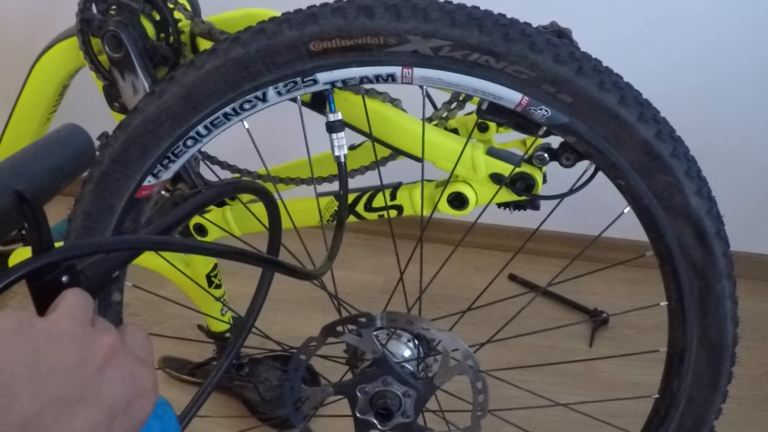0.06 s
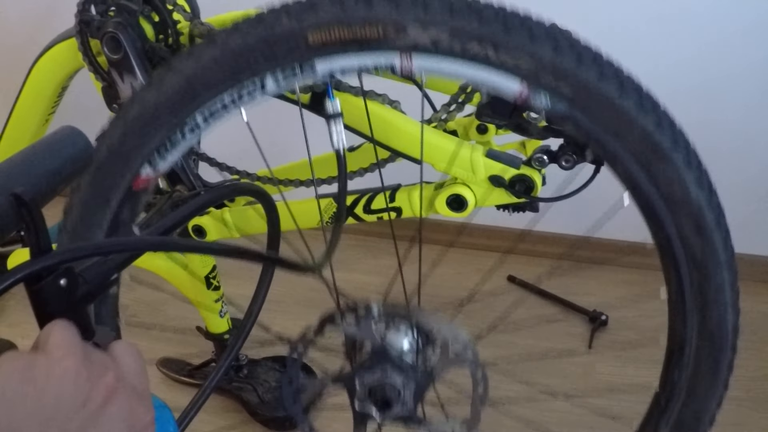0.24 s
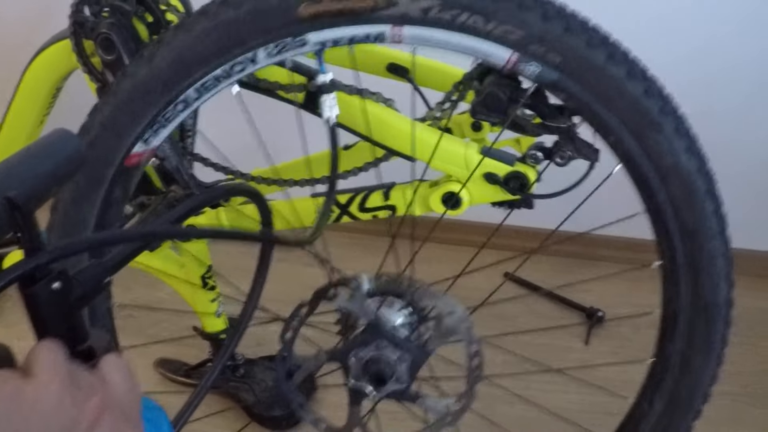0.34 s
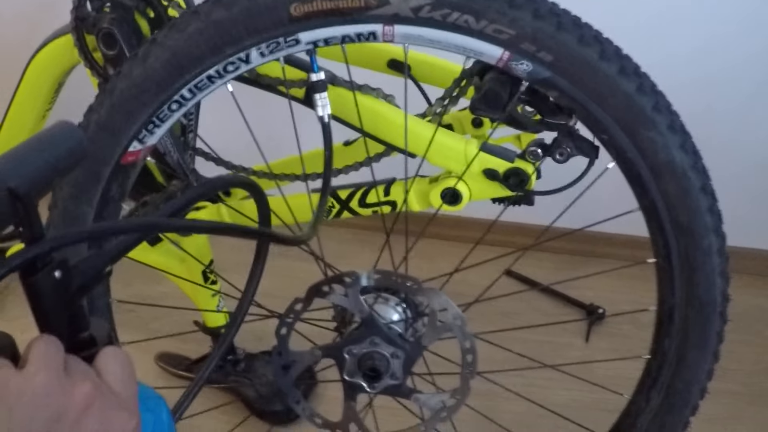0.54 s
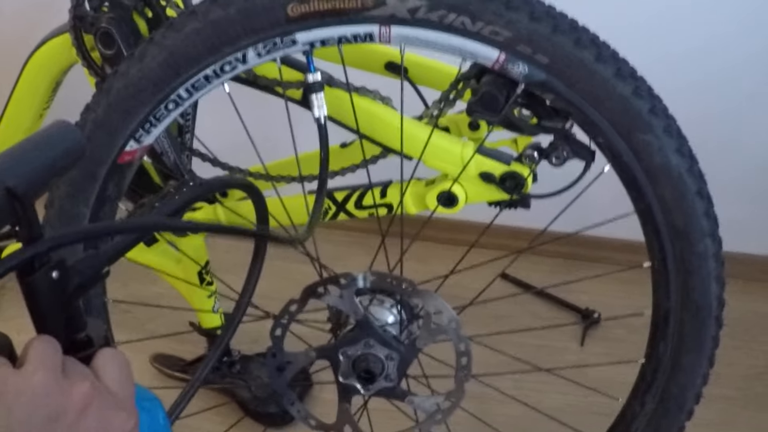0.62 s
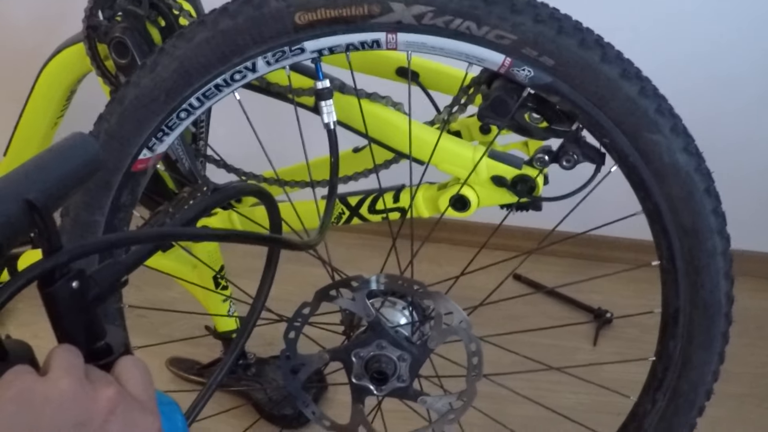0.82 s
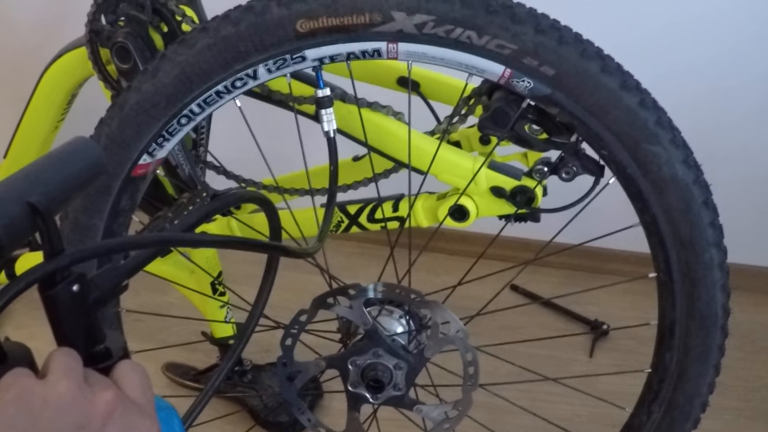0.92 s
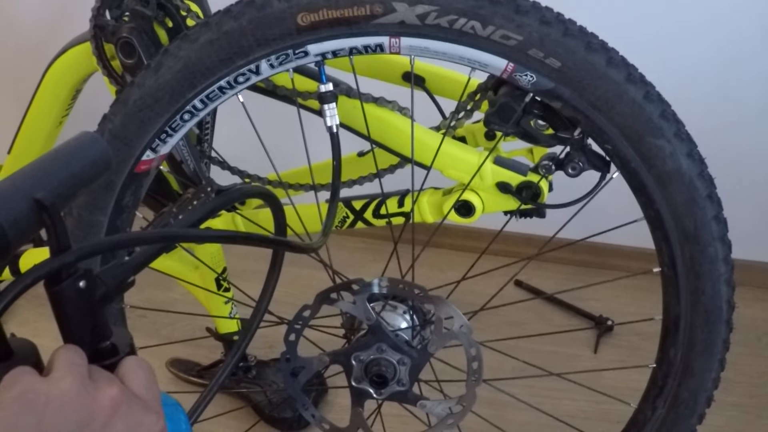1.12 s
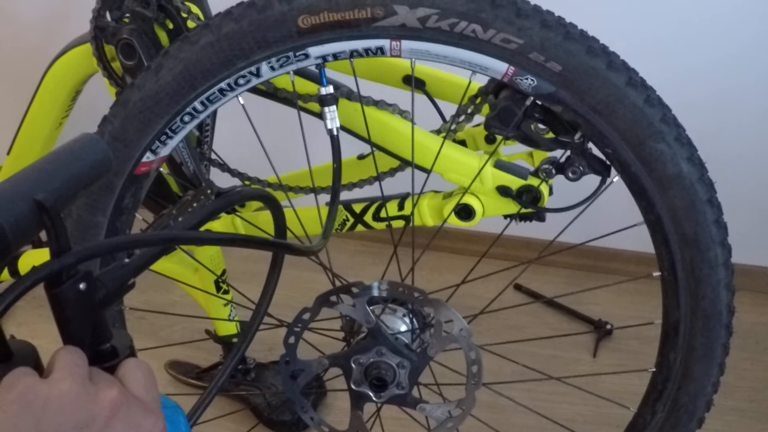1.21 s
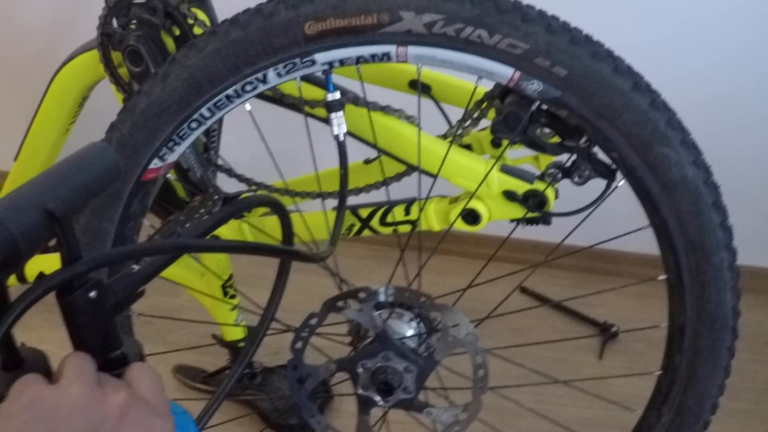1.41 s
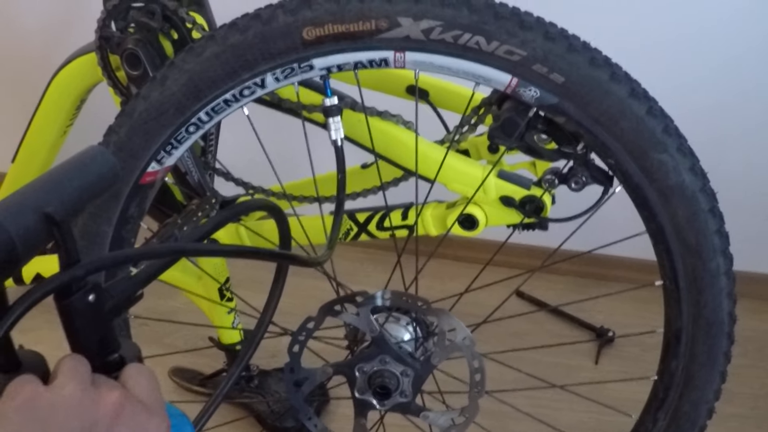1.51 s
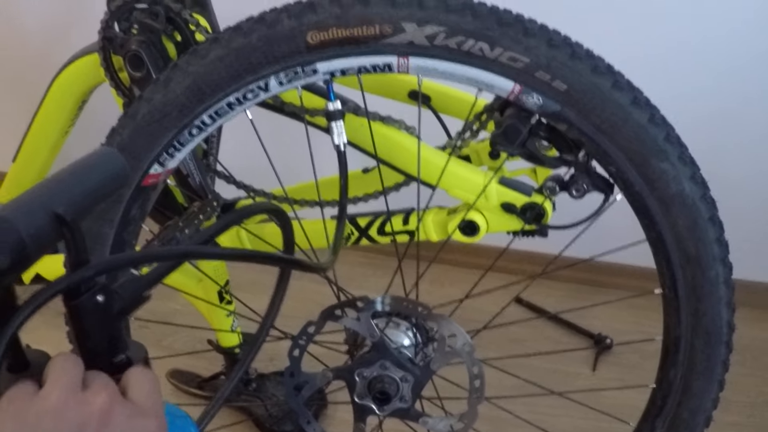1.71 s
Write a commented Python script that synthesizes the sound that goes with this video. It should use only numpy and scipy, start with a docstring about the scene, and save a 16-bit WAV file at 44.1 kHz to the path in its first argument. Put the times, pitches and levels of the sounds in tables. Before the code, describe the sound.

Compressed air hisses into a bicycle tyre after a faint tap click, with a brief valve squeal. The tyre ticks up the rim, then seats with a loud pop as the hiss fades, close up in a small room.

```python
"""A small room, the microphone close to a bicycle tyre being filled with compressed air.
The tap clicks, then air hisses through hose and valve; the valve squeals, and most of the whistling
resonances sag as the pressure evens out. The tyre fills with a low gush, its bead ticks up the rim in
small slips and at last snaps into its seat with a loud pop that overloads the microphone and leaves
the wheel ringing. Two soft handling knocks and a low rumble lie underneath."""
import sys
import numpy as np
from scipy import signal
from scipy.fft import rfft, irfft
from scipy.io import wavfile

SR = 44100
rng = np.random.default_rng(int(sys.argv[2]) if len(sys.argv) > 2 else 0)


def digitize_waveform(pressure):
    """Quantize a signal to 16-bit integers and store it at the path in sys.argv[1].

    Rows of a 2-D input are taken as channels; values are limited to [-1, 1].
    """
    field = np.atleast_2d(pressure).T
    bounded = np.clip(field, -1, 1)
    quanta = np.round(bounded * 32767).astype(np.int16)
    wavfile.write(sys.argv[1], SR, quanta)


N = 77175
T = np.arange(N) / SR


def amp(db):
    """Decibels to gain."""
    return 10 ** (np.asarray(db) / 20)


def unit_rms(x):
    """Scales to an rms of one."""
    return x / np.sqrt(np.mean(x ** 2) + 1e-20)


def curve(points, column=1):
    """Joins the rows of a time table by straight lines."""
    rows = np.array(points)
    return np.interp(T, rows[:, 0], rows[:, column])


def spectrum_at(points, hz, column=1):
    """Reads a spectrum table on a log-frequency axis."""
    rows = np.array(points)
    return np.interp(np.log(hz + 1), np.log(rows[:, 0] + 1), rows[:, column])


def add(mix, start_s, sound):
    """Mixes a sound in at the given time."""
    part = mix[round(start_s * SR):][:len(sound)]
    part += sound[:len(part)]


def noise(colour, column=1):
    """Noise of the given spectrum, rms one."""
    gain = amp(spectrum_at(colour, np.fft.rfftfreq(N, 1 / SR), column))
    return unit_rms(irfft(rfft(rng.standard_normal(N)) * gain, N))


def resonance(hz, width_hz):
    """Turbulence ringing in one resonance that follows hz, rms one; at 0 Hz, a random flutter."""
    pole = np.exp(-np.pi * width_hz / SR)
    turbulence = rng.standard_normal(N) + 1j * rng.standard_normal(N)
    flutter = signal.lfilter([1], [1, -2 * pole, pole * pole], turbulence)
    carrier = np.exp(2j * np.pi * np.cumsum(hz * np.ones(N)) / SR)
    return unit_rms((flutter * carrier).real)


def snap(colour, hold_s, fade_s):
    """A burst a few milliseconds long with the given spectrum."""
    envelope = np.exp(-np.maximum(T - hold_s, 0) / fade_s)[:2048]
    gain = amp(spectrum_at(colour, np.fft.rfftfreq(len(envelope), 1 / SR)))
    burst = rng.standard_normal(len(envelope))
    for _ in range(4):  # impose envelope and spectrum in turn
        phase = np.angle(rfft(burst * envelope))
        burst = irfft(gain * np.exp(1j * phase))
    burst = burst * np.sqrt(envelope)
    return burst * np.linalg.norm(envelope) / np.linalg.norm(burst)


def ringing(modes):
    """Struck modes, each dying at its own speed."""
    return sum(amp(db - 60 * T / t60) * np.sin(2 * np.pi * hz * T) for hz, db, t60 in modes)


# room tone at the microphone (frequency [Hz], relative level [dB])
ROOM_TONE_COLOUR = [(15, 3), (35, -2.5), (70, -13), (130, -17.5), (350, -27), (750, -28), (4000, -35),
                    (15000, -47)]
# low rumble (time [s], level [dB])
RUMBLE_LEVEL = [(0, -51.5), (.28, -60), (.37, -43), (.47, -44.5), (.55, -65), (.72, -47.5), (.95, -53),
                (1.06, -35), (1.25, -53), (1.75, -50)]
def room_tone():
    """The room's steady faint noise, and a rumble that swells most just after the pop."""
    steady = amp(-53.5) * noise(ROOM_TONE_COLOUR)
    return steady + amp(curve(RUMBLE_LEVEL)) * resonance(hz=48, width_hz=54)


# reverberation of the small room (frequency [Hz], t60 [s])
ROOM_DECAY = [(100, 0.45), (400, 0.49), (1000, 0.53), (2500, 0.56), (6000, 0.19), (14000, .25)]
def room_tail(colour, build_s=0.0016):
    """Diffuse reflections of a blow off the walls, each band dying at its own speed."""
    hz, t, bands = signal.stft(noise(colour), SR, nperseg=256)
    decay = amp(-60 * t / spectrum_at(ROOM_DECAY, hz)[:, None])
    tail = signal.istft(bands * decay, SR, nperseg=256)[1][:N]
    return tail * (1 - np.exp(-T / build_s))


# click of the tap (frequency [Hz], relative level [dB])
CLICK_COLOUR = [(100, 9), (450, -13), (680, 9), (1100, -11), (2300, 3.5), (2800, -3), (3150, 7), (3700, -4),
                (4400, -1.5), (6000, -11.5), (15000, -30)]
def tap_click():
    """The air tap clicks open, with the room behind it."""
    click = amp(-7.5) * room_tail(CLICK_COLOUR)
    add(click, 0, snap(CLICK_COLOUR, hold_s=0.0028, fade_s=0.0048))
    return amp(-38.5) * click


# the valve's pure whistle while the flow is fastest (time [s], level [dB])
SQUEAL_LEVEL = [(.187, -90), (.192, -37), (.218, -24), (.295, -24), (.32, -16), (.345, -27), (.445, -25.5),
                (.48, -44), (.6, -100)]
def valve_squeal(pitch_hz=4095, waver_hz=35, flicker_db=2.8):
    """The valve sings on one slightly unsteady note until the tyre has filled out."""
    hz = pitch_hz + waver_hz * resonance(0, width_hz=110)
    level_db = curve(SQUEAL_LEVEL) + flicker_db * resonance(0, width_hz=110)
    tone = np.sin(2 * np.pi * np.cumsum(hz) / SR)
    return amp(level_db) * tone * (T > SQUEAL_LEVEL[0][0])


# the tyre's four stages (slack [s], filled out [s], taut [s], seated [s])
TYRE_STAGES = [0.299, .42, .94, 1.04]
# rush of the jet (frequency [Hz], relative level at each of the four stages [dB])
JET_COLOUR = [(100, -11.5, -11.5, -11.5, -3), (290, -9, -7.5, -16, -3.5), (810, -3, -4.5, -7.5, -1.5),
              (1730, -10.5, -5, -7, -3.5), (2620, -3.5, 0.5, 3.5, 2), (3780, -1.5, 0.5, -0.5, 1.5),
              (4450, 8.5, 9.5, 7, 12), (5490, -3, 1.5, -2.5, 3), (6700, 2.5, 4.5, -11, 7),
              (9230, -2.5, 1, -0.5, 0), (11060, -7, -9, -15, -7.5), (12300, -4.5, -3.5, -4.5, -6),
              (15500, -0.5, -12, -15, -4)]
# resonances of hose and valve
# (start pitch [Hz], end pitch [Hz], width [Hz], level against the jet at each of the four stages [dB])
HOSE_WHISTLES = [(4148, 4060, 140, -10, -14, -31, -11.5), (4365, 4230, 190, -13.5, -8.5, -16, -13.5),
                 (4690, 4620, 440, -16, -15, -12, -18), (6724, 6390, 280, -4.5, -9, -8, -9.5),
                 (7450, 7020, 170, -42, -12.5, -10, -9.5), (8820, 8200, 150, -22, -19, -18, -11),
                 (9890, 9050, 120, -29, -10.5, -40, -17), (9550, 9440, 130, -37, -27, -40, -14),
                 (13100, 11900, 740, -33, -17, -31.5, -16.5), (14250, 16000, 240, -10, -44, -28, -38)]
# the resonances' travel from start to end pitch (time [s], share [0-1])
WHISTLE_GLIDE = [(.28, 0.02), (.45, .45), (.93, 0.63), (1.08, 1), (1.5, 0.96)]
# loudness of the hiss, which dips at the pop and then fades (time [s], level [dB])
HISS_LEVEL = [(.188, -72), (.195, -39), (.206, -34), (.216, -24), (.25, -20), (.32, -20), (.36, -22.5),
              (.58, -25), (.78, -28.5), (.98, -31.5), (1.03, -36), (1.45, -40.5), (1.75, -48)]
# the walls' reflection of the hiss (frequency [Hz], relative level [dB])
WALL_COLOUR = [(100, -0.5), (1000, -3), (6000, 0), (15000, 0.5)]
def air_hiss(flicker_db=0.28, room_db=-8):
    """Jet and whistles change colour as the tyre fills and seats; they dip at the pop, then fade."""
    crossfades = np.sqrt([np.interp(T, TYRE_STAGES, stage) for stage in np.eye(len(TYRE_STAGES))])
    air = sum(fade * noise(JET_COLOUR, column=k + 1) for k, fade in enumerate(crossfades))
    glide = curve(WHISTLE_GLIDE)
    for start_hz, end_hz, width_hz, *levels_db in HOSE_WHISTLES:
        whistle = resonance(start_hz + (end_hz - start_hz) * glide, width_hz)
        air += (amp(levels_db) @ crossfades) * whistle
    hiss_db = curve(HISS_LEVEL) + flicker_db * resonance(0, width_hz=61)
    air *= amp(hiss_db) * (T > HISS_LEVEL[0][0])
    room = room_tail(WALL_COLOUR)
    return air + amp(room_db) * signal.fftconvolve(air, room / np.linalg.norm(room))[:N]


# handling noise (time [s], level [dB], pitch [Hz], fade [s])
HANDLING_KNOCKS = [(.19, -40, 69, 0.0027), (1.531, -27.5, 68.6, 0.0058)]
def handling_knock(level_db, hz, fade_s, contact_s=0.00031):
    """A soft contact followed by a dull, quickly damped bump."""
    contact = amp(-2.5) * T / contact_s * np.exp(1 - T / contact_s)
    bump = np.exp(-T / fade_s) * np.sin(2 * np.pi * hz * T)
    return amp(level_db) * (contact - bump)


# air entering the slack tyre (time [s], pitch [Hz], level [dB])
GUSH_PATH = [(.21, 431.2, -69), (.235, 432.6, -40), (.27, 443.8, -38.5), (.31, 387.4, -39.5),
             (.335, 245, -31.5), (.36, 280, -40), (.47, 192.5, -59), (.56, 211, -77)]
def tyre_gush():
    """A hollow rush that drops in pitch as the slack tyre swells."""
    return amp(curve(GUSH_PATH, column=2)) * resonance(curve(GUSH_PATH), width_hz=305)


# small slips of the bead (time [s], level [dB])
BEAD_SLIPS = [(0.215, -31.5), (.263, -39), (.39, -23), (.504, -30.5), (.589, -27.5), (.655, -30),
              (.716, -32.5), (0.785, -36.5)]
# tick of one slip (frequency [Hz], relative level [dB])
TICK_COLOUR = [(100, -25), (480, -14.5), (720, 3.5), (880, -2), (1030, -1), (1250, -4.5), (1900, -2),
               (2700, -11.5), (5000, -11), (12000, -72)]
# the rim after a slip (frequency [Hz], level against the slip [dB], t60 [s])
RIM_MODES = [(668, -23.5, 0.079), (753, -19.5, 0.32), (1043, -9.5, .3), (1477, -11, 0.22),
             (1872, -11, 0.21)]
def bead_slip(level_db):
    """The bead jumps a little way up the rim, which rings faintly."""
    tick = amp(-11.5) * room_tail(TICK_COLOUR) + ringing(RIM_MODES)
    add(tick, 0, snap(TICK_COLOUR, hold_s=0.0035, fade_s=0.0066))
    return amp(level_db) * tick


# crack of the seating bead, heard close (frequency [Hz], relative level [dB])
CRACK_COLOUR = [(30, 6), (120, -6), (220, 4.5), (580, -3.5), (780, 6.5), (1100, 0.5), (1650, -1), (1900, 1),
                (2400, -1), (3050, -0.5), (3500, -6.5), (4600, -9.5), (5600, -28), (7000, -21),
                (10000, -37.5), (16000, -37)]
# first reflections to reach the microphone (delay [s], level against the crack [dB])
EARLY_REFLECTIONS = [(.0046, -20), (.0098, -12.5), (0.0143, -19)]
# tyre, rim and spokes after the pop (frequency [Hz], level [dB], t60 [s])
WHEEL_MODES = [(64.7, -28, 0.62), (202, -24.5, 0.5), (473.4, -33.5, 0.81), (772, -13.5, 0.12),
               (802, -33, .6), (855, -27, 0.33), (1197, -26, 0.32), (1500, -25, 0.35), (1865, -27, .45),
               (2213, -30, .42), (2574, -32, .45), (3370, -23, 0.074)]
def bead_pop(rise_s=0.00014):
    """The bead slams into its seat: a crack, its reflections, and the ringing wheel."""
    crack = snap(CRACK_COLOUR, hold_s=0.00265, fade_s=0.00079)
    crack *= np.minimum(T[:len(crack)] / rise_s, 1)
    pop = amp(-14) * room_tail(CRACK_COLOUR)
    add(pop, 0, crack)
    for delay_s, level_db in EARLY_REFLECTIONS:
        add(pop, delay_s, amp(level_db) * crack)
    return amp(-1) * pop + ringing(WHEEL_MODES)


def scene():
    """Air, tyre and room as they reach one microphone beside the wheel."""
    mix = room_tone()
    add(mix, start_s=0.1522, sound=tap_click())
    mix += valve_squeal() + air_hiss()
    for start_s, level_db, hz, fade_s in HANDLING_KNOCKS:
        add(mix, start_s, handling_knock(level_db, hz, fade_s))
    mix += tyre_gush()
    for start_s, level_db in BEAD_SLIPS:
        add(mix, start_s, bead_slip(level_db))
    add(mix, start_s=1.003, sound=bead_pop())
    return mix[None]


def record(dry):
    """The microphone drops the deepest bass and overloads on the pop; then the top treble is cut."""
    low_cut_hz, high_cut_hz, ceiling = 20, 15380, 0.95
    thinned = signal.sosfilt(signal.butter(2, low_cut_hz, "highpass", fs=SR, output="sos"), dry)
    clipped = thinned / (1 + (thinned / ceiling) ** 6) ** (1 / 6)
    lowpass = signal.firwin(511, high_cut_hz, window=("kaiser", 9), fs=SR)
    return signal.oaconvolve(clipped, lowpass[None], "same")


dry = scene()
out = record(dry)
digitize_waveform(out)
```